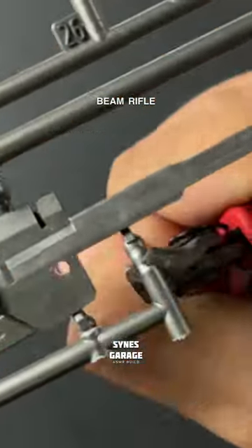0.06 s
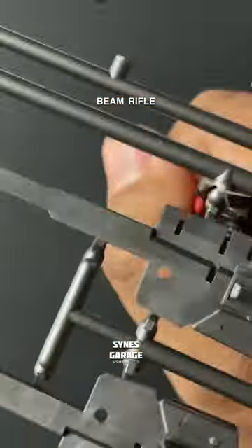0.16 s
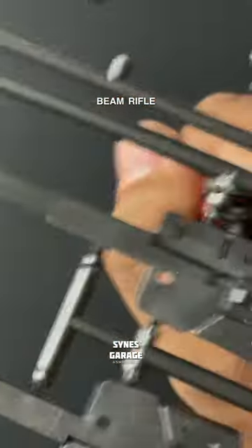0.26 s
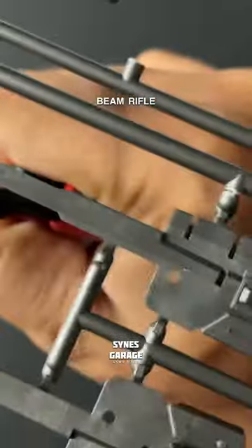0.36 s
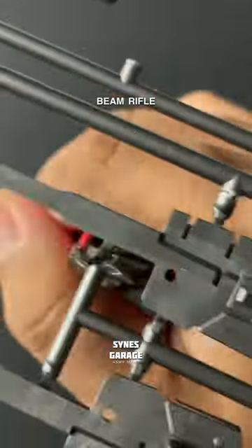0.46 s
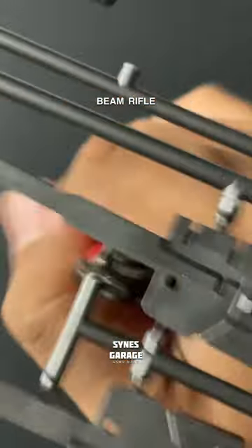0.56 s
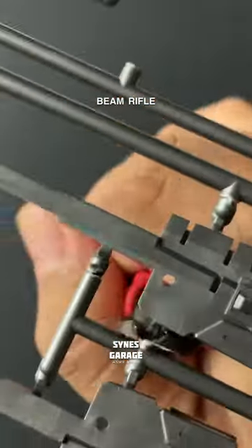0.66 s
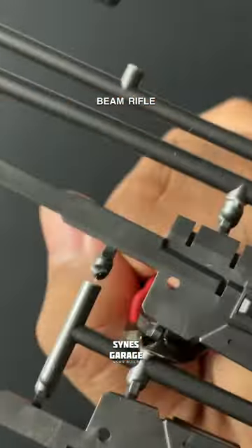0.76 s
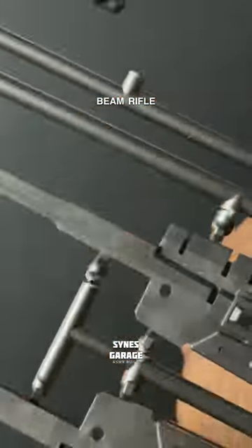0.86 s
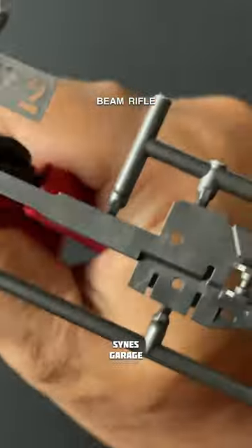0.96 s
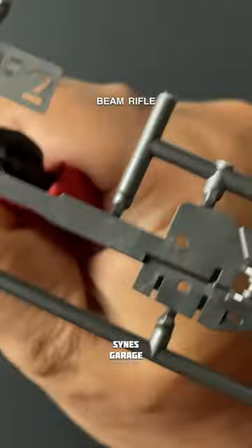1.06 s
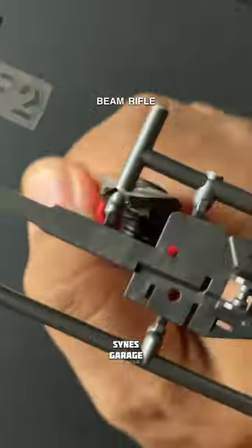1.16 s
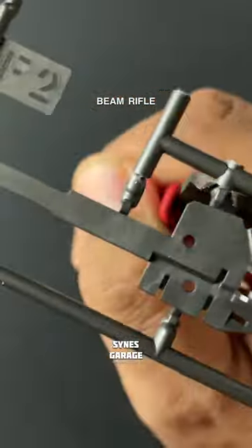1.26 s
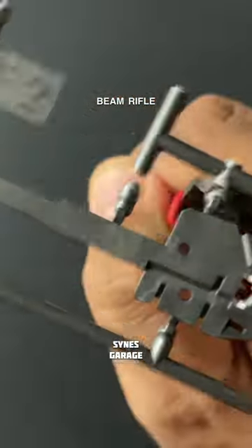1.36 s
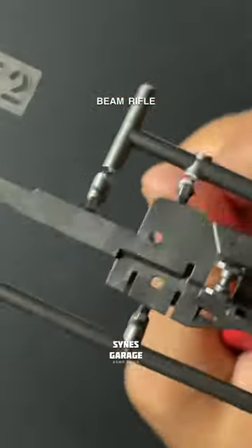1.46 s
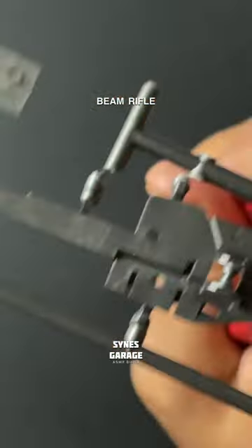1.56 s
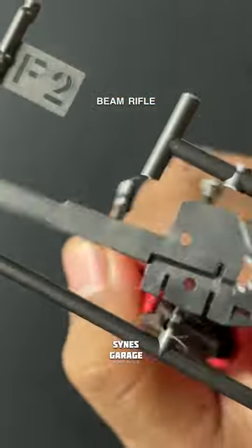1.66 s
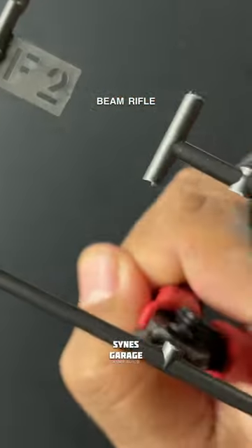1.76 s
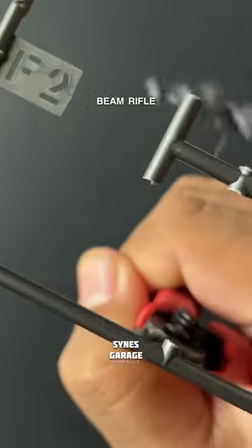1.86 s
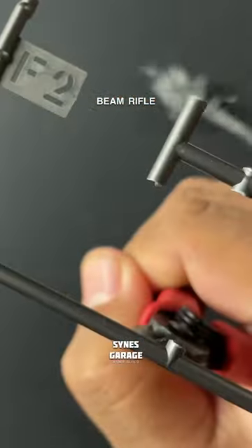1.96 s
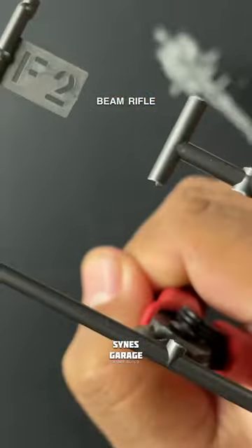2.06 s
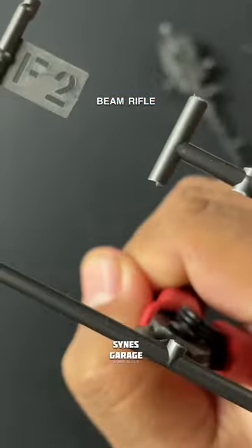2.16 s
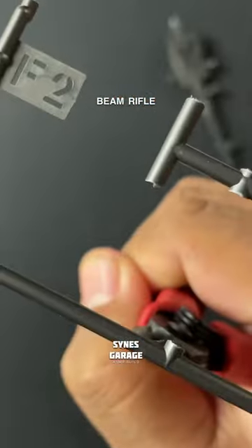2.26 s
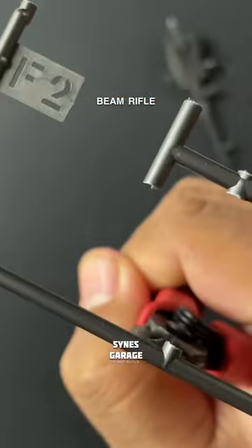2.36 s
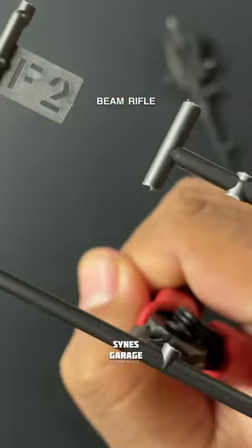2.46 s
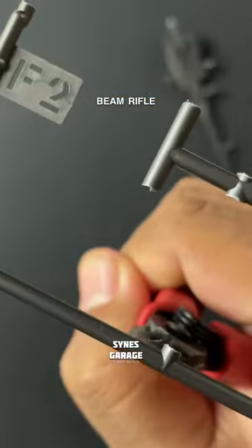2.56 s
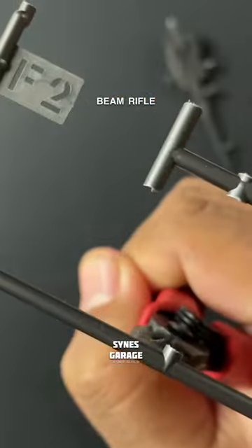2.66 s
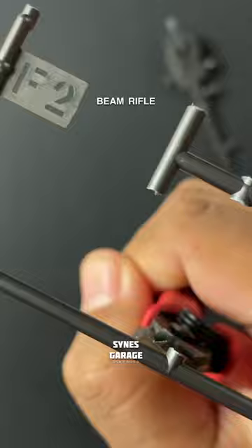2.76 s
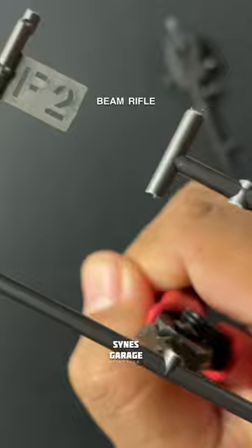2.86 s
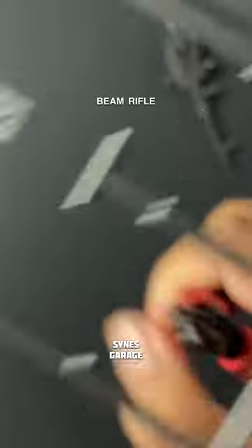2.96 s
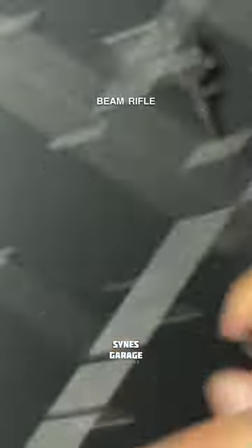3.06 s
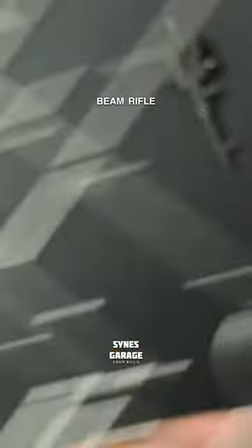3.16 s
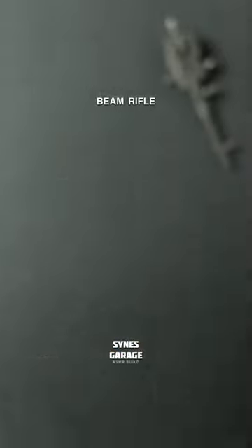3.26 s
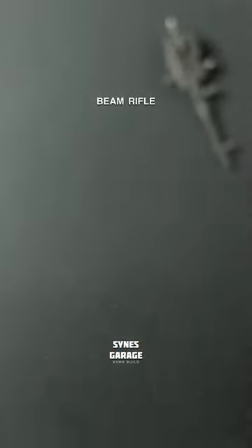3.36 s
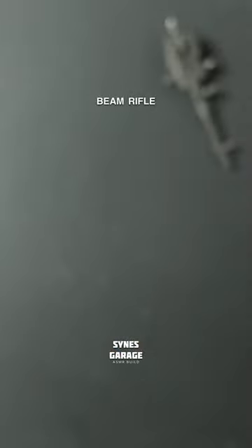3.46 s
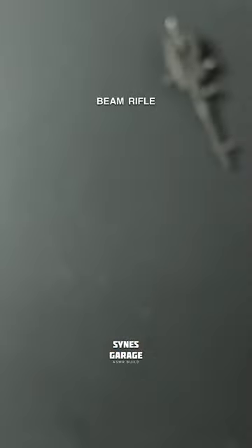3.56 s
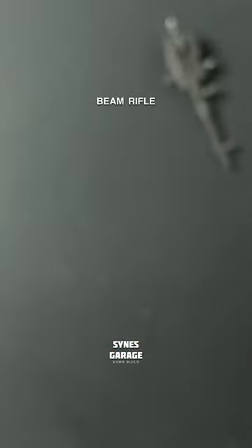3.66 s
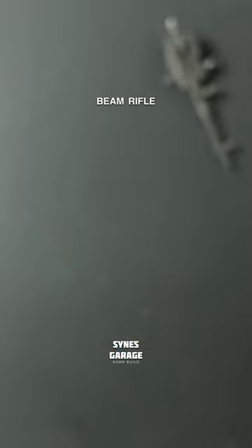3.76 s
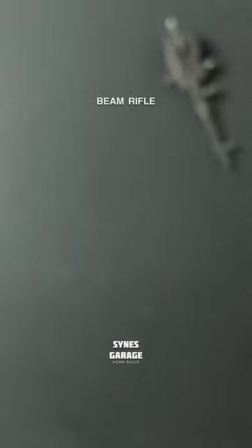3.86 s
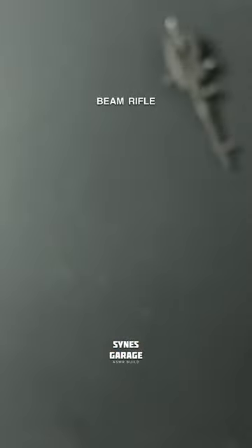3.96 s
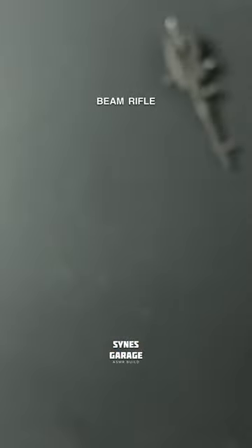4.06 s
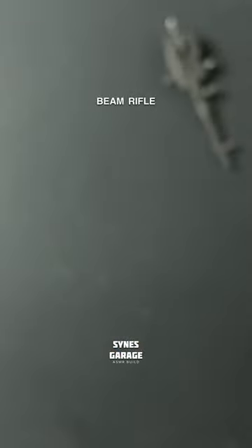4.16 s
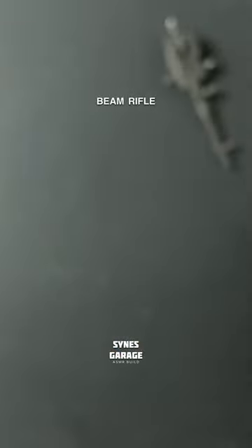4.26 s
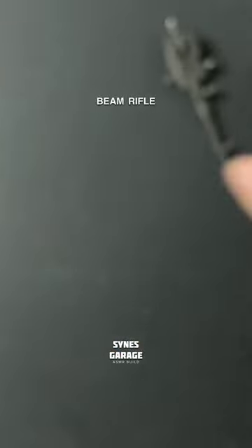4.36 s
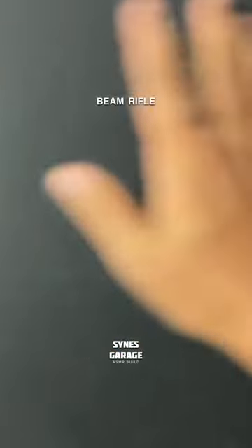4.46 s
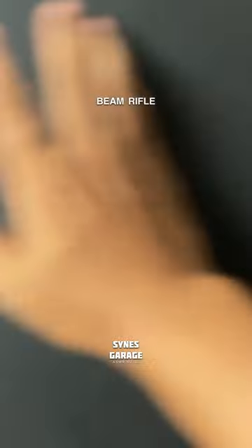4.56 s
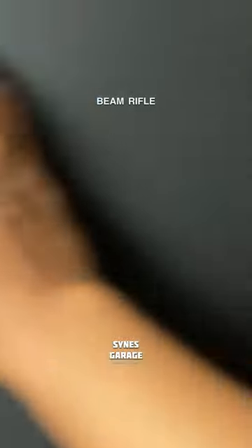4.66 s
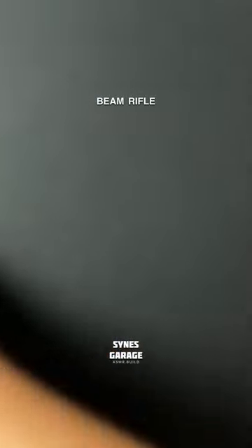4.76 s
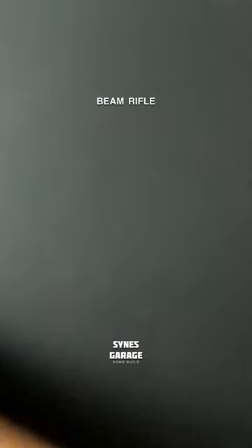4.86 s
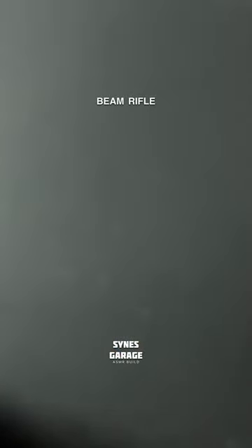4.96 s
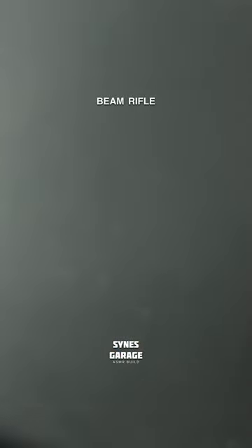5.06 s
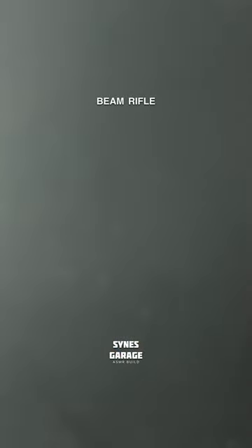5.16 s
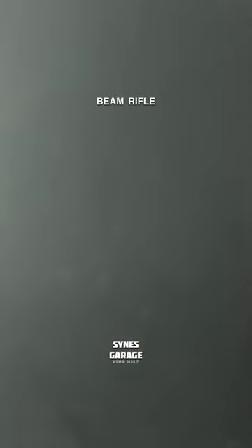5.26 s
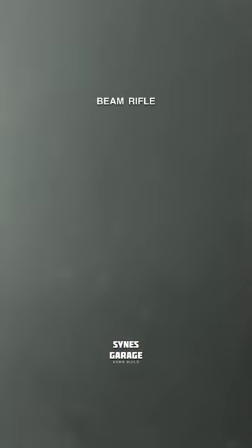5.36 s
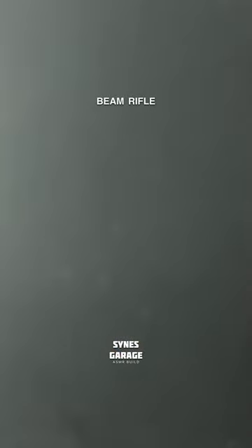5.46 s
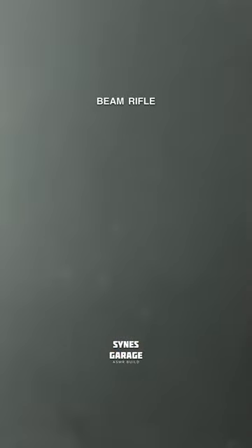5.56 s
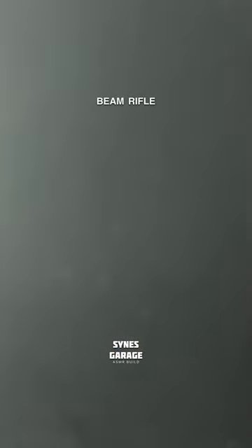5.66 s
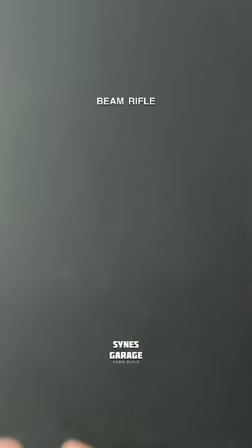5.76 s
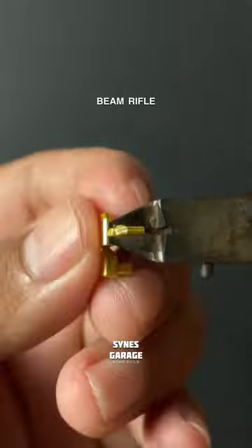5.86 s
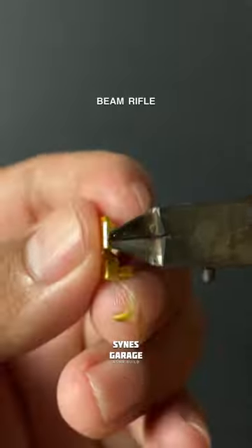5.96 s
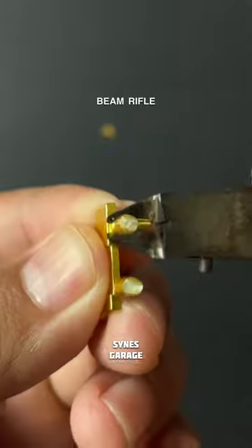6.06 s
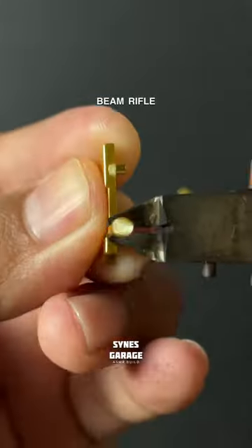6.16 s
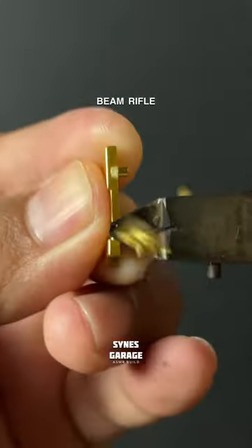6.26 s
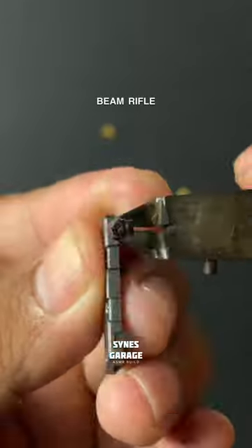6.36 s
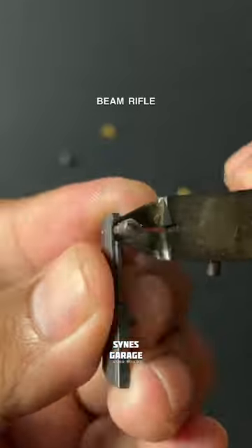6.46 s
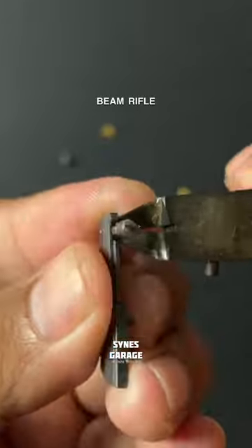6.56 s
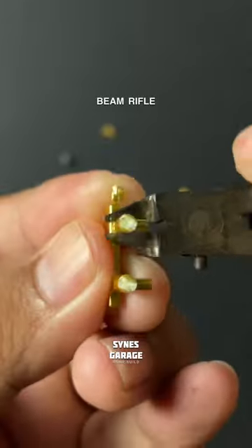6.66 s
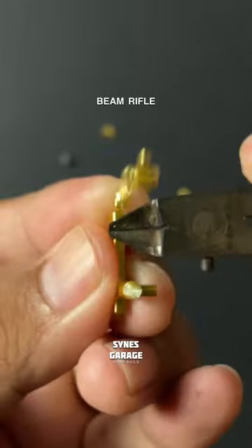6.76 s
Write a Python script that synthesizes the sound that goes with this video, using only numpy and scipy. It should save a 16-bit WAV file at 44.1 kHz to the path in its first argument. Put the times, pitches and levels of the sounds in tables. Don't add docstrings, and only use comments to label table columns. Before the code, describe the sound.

Very close stereo sound in a small quiet room with soft hiss and low building rumble. From 0.1 to 1.7 s nippers snap through a hard plastic frame eleven times, about every 0.16 s: loud, dry cracks with a short hollow ring, some overloading, tails chopped by abrupt cuts, with small clicks and faint spring whistles. The last snip rings out; at 1.97 s the freed part lands brightly, bounces at 2.15 and patters until 2.35. Faint sleeve rustle and tiny handling clicks follow to 3.3. At 3.5 the frame scuffs, thudding on the table at 3.84; the tool knocks down at 4.06. A palm lands near 4.4 and brushes the mat until 5.6, gritty and uneven, stubs ticking along. After a lull, thin stubs are trimmed from 5.92 to 6.73 in six quick moments, brighter, shorter, drier clicks, some doubled.

```python
import sys
import numpy as np
from scipy import signal
from scipy.fft import rfft, irfft, next_fast_len
from scipy.io import wavfile
from scipy.ndimage import uniform_filter1d, map_coordinates

SR = 44100
rng = np.random.default_rng(int(sys.argv[2]) if len(sys.argv) > 2 else 0)


def invert_db(level):
    return 10 ** (np.asarray(level, dtype=float) / 20)


def file_out(sig):
    cols = np.atleast_2d(sig).T
    lim = np.clip(cols, -1, 1)
    pcm = np.round(lim * 32767).astype(np.int16)
    wavfile.write(sys.argv[1], SR, pcm)


N = 299880

SCENE_CHANGES = [-1, .025, .181, .340, .499, .657, .823, .984, 1.140, 1.298, 1.458, 1.622, 5.864, 6.023,
                 6.176, 6.336, 6.502, 6.658]

# frequency in Hz, level in dB per Hz.
RUMBLE_SPECTRUM = [(12, -54), (20, -26.5), (50, -4.5), (69, -2), (108, -11.5), (127, -12.5), (140, -19.5),
                   (178, -29.5), (220, -19.5), (290, -45), (480, -120)]
# centre in seconds, half length in seconds, level in dB.
SWELLS = [(.3, 0.37, -58), (1.17, 0.23, -50.5), (1.72, 0.076, -43.5), (2.55, 0.56, -51.5),
          (3.6, 0.21, -49.5), (3.95, 0.098, -40.5), (4.15, 0.4, -59), (5.72, 0.2, -50.5), (6.7, 0.18, -74)]
# frequency in Hz, level in dB per Hz.
HISS_SPECTRUM = [(90, -29.5), (150, -12), (370, -18.5), (1100, -23.5), (2500, -29.5), (4500, -33),
                 (6800, -46.5), (9000, -49), (13000, -73)]
# frequency in Hz, t60 in seconds, colour in dB.
ROOM_DECAY = [(127, 0.45, 8.5), (406, 0.39, -6), (950, 0.36, -1), (1680, 0.35, -2.5), (2300, 0.27, 4.5),
              (3440, 0.2, -1.5), (5870, 0.18, 0.5), (8300, 0.17, -5.5), (10500, 0.17, -6),
              (13000, 0.29, -5.5), (15600, 0.083, -2.5)]

# frequency in Hz, left-right likeness from 0 to 1.
NEAR_LIKENESS = [(100, .97), (300, .93), (700, .72), (2000, .72), (4500, .9), (7000, .995)]
# frequency in Hz, left-right likeness from 0 to 1.
FAR_LIKENESS = [(60, .96), (300, .86), (700, .4), (1500, .3), (3000, .55), (5500, .9), (7400, .999)]
# frequency in Hz, lead of the left in radians.
PORT_PHASE = [(250, 0), (1290, -.6), (2930, .6), (3620, .1), (5170, .3), (6460, -.3), (7600, -3.05),
              (9000, -3.25), (10300, -5.8), (12800, -6.8), (14000, -9.2), (16200, -10)]
# frequency in Hz, share of the left-right gap from 0 to 1.
HAND_SHADOW = [(300, 0), (1200, 1), (4500, 1), (6600, 0)]

# frequency in Hz, level in dB per Hz.
MAT_SPECTRUM = [(60, -22), (110, -1), (200, -9.5), (500, -4), (1500, -4.5), (3500, -9.5), (4900, -14),
                (6100, -16.5), (6650, -12.5), (7100, -14.5), (8200, -9), (11000, -18.5), (13200, -23),
                (14000, -16), (15600, -42.5)]
# time in seconds, rub level in dB.
RUSTLE = [(2.2, -48.5), (2.36, -71.5), (2.44, -64), (2.55, -74.5), (2.62, -69.5), (2.76, -76.5), (2.9, -97)]
# time in seconds, rub level in dB.
FIDGET = [(2.9, -77.5), (3.12, -65.5), (3.3, -72), (3.46, -75)]
# time in seconds, rub level in dB.
SCUFF = [(3.46, -86), (3.498, -43.5), (3.536, -40), (3.616, -58.5), (3.694, -68), (3.82, -82)]
# time in seconds, rub level in dB.
LAND = [(4.1, -69.5), (4.34, -69), (4.36, -58), (4.44, -52.5), (4.49, -54)]
# time in seconds, rub level in dB.
SWEEP = [(4.493, -58), (4.503, -46.5), (4.6, -45), (4.72, -45.5), (4.9, -46), (5.042, -43.5), (5.19, -44.5),
         (5.21, -41), (5.28, -44), (5.4, -46.5), (5.49, -46.5), (5.59, -43.5), (5.62, -70)]
# time in seconds, rub level in dB.
LIFT = [(5.6, -57.5), (5.82, -61.5), (5.86, -58)]
# pressure curve, low band in dB, high band in dB at firm pressure.
GESTURES = [
    (RUSTLE, 6.4, -2.8),
    (FIDGET, 2.1, 2.7),
    (SCUFF, -5, -8.5),
    (LAND, -14, -1.5),
    (SWEEP, -1.65, -1.8),
    (LIFT, 2.6, -12.5),
]

# start in seconds, end in seconds, frequency in Hz, level in dB.
SPRING_WHISTLES = [(0.35, .41, 3820, -72.5), (0.543, 0.57, 4150, -75), (0.64, 0.724, 4030, -65.5),
                   (1.194, 1.233, 3940, -51), (1.299, 1.36, 3902, -57.5), (1.775, 1.859, 3874, -69),
                   (1.884, 1.958, 3890, -62.5), (5.881, 5.927, 5220, -63), (6.516, 6.57, 4480, -69.5)]
# start in seconds, frequency in Hz, level in dB, t60 in seconds.
SINGLE_RINGS = [(.0945, 2440, -25.5, 0.18), (.263, 9450, -17.5, 0.044), (.265, 2460, -25.5, 0.16),
                (.265, 2245, -23, 0.21), (.899, 2444, -23.5, 0.12), (.899, 2230, -25, .2),
                (1.056, 2300, -37, 0.25), (.412, 1300, -20.5, .03), (.578, 1380, -26.5, 0.026),
                (.723, 1420, -7, 0.021), (0.897, 1414, -12, 0.037), (1.223, 1440, -11.5, 0.019),
                (1.36, 2410, -28.5, 0.21), (1.532, 9400, -16.5, .03), (1.532, 1440, -10.5, 0.02),
                (1.695, 9400, -15, 0.044), (1.695, 1370, -4.5, 0.016), (1.712, 8770, 1.5, 0.025),
                (3.843, 404, -18.5, 0.064), (3.843, 1145, -34, 0.22), (3.843, 1900, -37.5, 0.18),
                (4.057, 372, -22.5, 0.37), (4.057, 968, -34, 0.47), (4.057, 1268, -30, 0.37),
                (4.057, 1690, -43, .3), (5.925, 10500, -18, .012), (5.926, 300, -33, 0.064),
                (6.727, 5540, -23.5, .03)]
# frequency in Hz, level in dB, t60 in seconds.
PART_RING_MODES = [(1178, -9, .12), (1860, -10, 0.099), (2880, -12, 0.092), (3150, -21.5, 0.102),
                   (3746, 1, 0.067), (3960, -10, 0.13), (5970, -11, .12), (6635, -6, .09),
                   (6714, -2.5, 0.056), (8300, 10.5, .05), (8340, 16, 0.095), (9000, 7.5, 0.095),
                   (10940, 5.5, 0.054), (12440, 1, 0.08)]
# start in seconds, level in dB.
PART_RINGS = [
    (1.9715, -25.5),
    (2.147, -35.5),
    (2.2564, -58),
    (2.2962, -49),
]

# mode frequency in Hz, width in Hz, level in dB.
FRAME_BODY = [(372, 190, 7), (930, 1100, 2), (1380, 670, 5), (2050, 330, -1), (2390, 270, 2),
              (3230, 1400, -9.5), (3720, 510, -6), (5700, 200, -15.5), (7055, 3300, -13), (9120, 3800, 1),
              (12470, 3700, -1.5), (15200, 1800, -16.5)]
# mode frequency in Hz, width in Hz, level in dB.
STUB_BODY = [(248, 65, -9.5), (890, 150, -19.5), (1996, 190, -7), (2340, 200, -5), (3867, 6100, -13.5),
             (5610, 240, 4), (7700, 1700, -1.5), (10760, 1000, 12), (11400, 1600, -3), (16500, 1600, 13)]
# mode frequency in Hz, width in Hz, level in dB.
PART_BODY = [(121, 36, 12.5), (490, 92, 14), (1270, 380, 3), (1900, 2000, -1.5), (3570, 160, 4),
             (6700, 3900, -14.5), (8100, 230, -5.5), (10000, 4900, 2.5), (12900, 1200, -22.5),
             (15800, 1800, -13)]
# mode frequency in Hz, width in Hz, level in dB.
TABLE_BODY = [(120.2, 26, -4.5), (240, 79, -5), (393.3, 140, 3), (715, 220, 6), (1190, 375, 2),
              (1990, 630, -7), (4020, 2600, -8.5), (5950, 2000, -14)]
LOOSE_END_HZ = (2150, 2800)

# start in seconds, peak in dB, low band in dB,
# high band in dB.
TICKS = [(-.06, -4, -30, -31), (.056, -36, -53, -23), (.522, -48.5, -26, 11.5), (1.202, -49.5, -26, 5.5),
         (1.35, -26.5, -23.5, 0.5), (1.673, -33, -28.5, -1), (1.706, -29, -8, 2.5),
         (1.712, -24.5, -20, 6.5), (1.793, -37.5, -26.5, -6), (2.921, -55, -16.5, 12.5),
         (2.99, -65, -16, 14), (3.052, -58, -16, -3), (3.195, -66, -20, 5)]
# start in seconds, peak in dB, low band in dB, high band in dB.
TOUCHES = [(.088, -18.5, -20, -2), (1.960, -24.5, -3, -14.5), (3.060, -51, -21, 6),
           (3.105, -57, -22.5, -14), (6.098, -47.5, -12.5, 8.5), (6.714, -47.5, 0.5, -7)]
# start in seconds, peak in dB, low band in
# dB, high band in dB.
LIGHT_CLICKS = [(4.5052, -39, -10, -13), (4.525, -39, -13, -1), (4.548, -35.5, -3.5, -18), (4.9687, -45, -13, 21),
                (4.9911, -40, -13, 28.5), (5.0101, -38, -28, 21.5), (5.0844, -38, -20, -4), (5.1562, -37, -16, 10),
                (5.1982, -22.5, -31, -19.5), (5.2824, -49, -18, -1.5), (5.315, -22, -14.5, 10),
                (5.4895, -50, -19, -2), (5.5424, -43, -19, 16), (5.5571, -47, -22, 6.5), (3.4823, -41, -10, 0),
                (3.4923, -42, -9, -7.5), (3.5277, -42.5, 1, -1), (3.8425, -26.5, -12.5, -31),
                (4.057, -37, -23, -31)]
# start in seconds, peak in dB, low band in dB, high band in dB.
DROPS = [
    (1.9686, -22, -34, 4),
    (1.9707, -10, -23.5, 12),
    (2.1408, -10, -21.5, -26),
    (2.146, -17, -8, 0),
    (2.2549, -29.5, -19, -1),
    (2.2959, -33.5, -9, 8.5),
    (2.3181, -39, -12, -7.5),
    (2.3455, -44, -8, 0),
]
# start in seconds, peak in dB, low band in dB, high band in dB.
THUDS = [
    (3.8425, -2.5, -11.5, -17),
    (3.856, -16, -0.5, -11.5),
    (3.895, -24.5, 1, -27),
    (3.93, -28.5, 0.5, -29),
    (4.047, -28, 12.5, -30),
    (4.057, -8.5, -6.5, -8),
    (4.075, -21, 2, -23),
    (4.087, -16.5, -12, -12),
    (4.108, -20.5, 5, -24),
]
# start in seconds, peak in dB, low band in dB, high band in dB, free-end ring in dB.
TRIMS = [(5.9248, -7, -31.5, 12, 3), (6.1079, -5, -26.5, 1.5, 5), (6.111, -16, -19, 3, -3),
         (6.2437, -7, -27.5, 9, 5.5), (6.2474, -7.5, -24, -1, -6), (6.4253, -13, -36, 1, 2.5),
         (6.5814, -7, -31, 7, 0.5), (6.7276, -7, -31, 0, -2)]
# start in seconds, peak in dB, low in dB, high in dB, runner ring in dB.
BITES = [(.25, -32.5, -0.5, -39.5, 9.5), (.281, -23, -26, -41, 2.5), (.402, -52, -9.5, -36, -1),
         (.911, -18.5, -22, -35, 4.5), (.887, -40, -5.5, -44, 6.5), (1.044, -55, 2, -43, 14)]
# start in seconds, peak in dB, low band in dB, high band in dB, runner ring in dB.
SNIPS = [(0.0943, 0.5, -9.5, -5.5, 3), (0.2623, 1, -7.5, -5, 1), (0.41, -5.5, -2.5, -15, 4.5),
         (0.5761, -7, -2.5, -12, 1.5), (0.7217, -0.5, -8, -21.5, -3.5), (0.8981, 3.5, -7, -24, 2.5),
         (1.055, -5, -12, -29.5, -3), (1.222, -3, -10, -6.5, 1.5), (1.3574, 4.5, -16, -7, -2),
         (1.5313, -9, -8, -23, -3), (1.694, -4.5, -5.5, -4, -3)]

FIRM_DB, BRIGHTENS = -48.5, 0.41
RUMBLE_DB = -55.5
SNIP_HISS_DB, LONG_HISS_DB, TRIM_HISS_DB = -57, -62.5, -61.5
SOFT_HZ = 6600
TINY, SHORT, LONG = 3584, 6656, 13312


def unit(x):
    return x / np.sqrt(np.mean(x ** 2) + 1e-20)


def along(points, hz):
    f, v = np.transpose(points)
    return np.interp(np.log(hz + 1), np.log(f + 1), v)


def wobble(rate):
    knots = rng.standard_normal(int(N * rate / SR) + 4)
    return map_coordinates(knots, [np.arange(N) * rate / SR])


def filtered(x, response):
    m = next_fast_len(x.shape[-1] + 4096)
    return irfft(rfft(x, m) * response(np.fft.rfftfreq(m, 1 / SR)), m)[..., :x.shape[-1]]


def spread(pair, likeness):
    def mid_side(hz):
        turn = np.arccos(np.clip(along(likeness, hz), -1, 1)) / 2
        return np.array([np.cos(turn), np.sin(turn)])

    mid, side = filtered(pair, mid_side)
    return np.array([mid + side, mid - side])


def rush(spectrum, patchy_db, drift_db=0):
    z = signal.stft(rng.standard_normal((2, N)), nperseg=512)[2]
    patches = uniform_filter1d(rng.standard_normal(z.shape[1:]), size=6, axis=0)
    patches = uniform_filter1d(patches, size=8, axis=1)
    drift = uniform_filter1d(uniform_filter1d(patches, size=18, axis=0), size=14, axis=1)
    gain = invert_db(patchy_db * unit(patches) + drift_db * unit(drift))
    pair = signal.istft(z * gain, nperseg=512)[1][:, :N]
    coloured = filtered(pair, lambda hz: invert_db(along(spectrum, hz)))
    return unit(spread(coloured, FAR_LIKENESS))


def time_left(s):
    return min([cut - s for cut in SCENE_CHANGES if cut > s] + [1])


def air():
    t = np.arange(N) / SR
    take = np.searchsorted(SCENE_CHANGES, t) - 1
    swell = invert_db(RUMBLE_DB) + sum(invert_db(db) * np.exp(-((t - s) / half) ** 2) for s, half, db in SWELLS)
    rumble = swell * invert_db(2.5 * wobble(8)) * rush(RUMBLE_SPECTRUM, 0.8)
    snipping, before_trims = t < SCENE_CHANGES[11], t < SCENE_CHANGES[12]
    hiss_db = np.select([snipping, before_trims], [SNIP_HISS_DB, LONG_HISS_DB], TRIM_HISS_DB)
    hiss = invert_db(hiss_db + [[0.6], [-0.6]] + 0.89 * wobble(21)) * rush(HISS_SPECTRUM, 3.5, drift_db=-0.5)
    fade_in = np.clip((t - np.array(SCENE_CHANGES)[take]) / 0.1, 0.08, 1)
    return (rumble + hiss) * fade_in


def hand():
    t = np.arange(N) / SR
    edges = np.array([0, 1000, 7200, SR])[:, None, None]
    rub = rush(MAT_SPECTRUM, 1.2, drift_db=1.0)
    bands = filtered(rub, lambda hz: (hz >= edges[:-1]) * (hz < edges[1:]))
    bands = np.array([unit(band) for band in bands])
    gains = 0
    for pressure, low_db, high_db in GESTURES:
        seconds, level_db = np.transpose(pressure)
        rub_db = np.interp(t, seconds, level_db)
        touching = (t > seconds[0]) * (t < seconds[-1])
        treble_db = rub_db + high_db + BRIGHTENS * (rub_db - FIRM_DB)
        gains = gains + touching * invert_db([rub_db + low_db, rub_db, treble_db])
    catches = (rng.random(N) < 130 / SR) * rng.exponential(70.0, N)
    grit = 1 + 0.19 * uniform_filter1d(catches, size=50)
    unsteady = invert_db([[0.5], [-0.5]] + 0.69 * wobble(25) + 1.12 * wobble(300))
    present = t < SCENE_CHANGES[12]
    return present * grit * unsteady * np.sum(gains[:, None] * bands, axis=0)


def spring():
    out, t, rub = np.zeros(N), np.arange(N) / SR, wobble(550)
    for start, end, hz, db in SPRING_WHISTLES:
        swell = np.clip(np.minimum((t - start) / 0.025, (end - t) / 0.0098), 0, 1)
        out += invert_db(db) * swell * np.sin(2 * np.pi * hz * t) * rub
    return out


def ringing():
    out, t = np.zeros(N + LONG), np.arange(LONG) / SR
    shiver = 1 + 0.6 * wobble(160)
    rings = list(SINGLE_RINGS)
    for s, db in PART_RINGS:
        for hz, mode_db, t60 in PART_RING_MODES:
            rings.append((s, hz, db + mode_db + rng.normal(0, 2.2), t60))
    for s, hz, db, t60 in rings:
        envelope = invert_db(db - 60 * t / t60) * (1 - np.exp(-t / 0.0006)) * (t < time_left(s))
        start = round(s * SR)
        out[start:start + LONG] += envelope * np.sin(2 * np.pi * (hz * t + rng.random()))
    return out[:N] * shiver * invert_db([[0.8], [-0.8]])


def body_modes(modes, free_db):
    luck = rng.standard_normal((len(modes), 2)) * [1.5, 0.01]

    def response(f):
        total = 0
        for k, ((hz, width, db), (luck_db, detune)) in enumerate(zip(modes, luck)):
            loose_db = free_db * (LOOSE_END_HZ[0] < hz < LOOSE_END_HZ[1])
            centre = hz * (1 + detune)
            mode = 1j * f * width / (centre ** 2 - f * f + 1j * f * width)
            total = total + (-1) ** k * invert_db(db + luck_db + loose_db) * mode
        return total

    return response


def room_answer(t, lead):
    size = len(t)
    room_hz, *columns = np.transpose(ROOM_DECAY)
    bins = np.fft.rfftfreq(256, 1 / SR)
    t60, colour_db = (along(np.transpose([room_hz, c]), bins)[:, None] for c in columns)
    _, frames, z = signal.stft(rng.standard_normal((2, size - lead)), SR, nperseg=256)
    tail = signal.istft(z * invert_db(colour_db - 60 * frames / t60), SR, nperseg=256)[1][:, :size - lead]
    tail = np.pad(tail, ((0, 0), (lead, 0)))
    echoes = unit(uniform_filter1d(rng.standard_normal(size), size=90))
    lumps = invert_db(3.5 * echoes * np.exp(-np.clip(t, 0, None) / 0.04))
    return spread(tail * lumps * np.clip(t / 0.0015, 0, 1), FAR_LIKENESS)


def strikes(events, modes, crack_t60, low_hz, high_hz, bite_db, room_db, pan_db, size=LONG, order=3):
    out = np.zeros((2, N + 2 * size))
    lead = round(0.02 * SR)
    t = np.arange(size) / SR - 0.02
    after = np.clip(t, 0, None)
    edges = [(low_hz, "low"), ([low_hz, high_hz], "band"), (high_hz, "high")]
    bands = [signal.butter(order, edge, kind, fs=SR, output="sos") for edge, kind in edges]
    attack = 1 - np.exp(-after / np.array([[0.0018], [0.0007], [0.0005]]))
    cracks = invert_db(-60 * after / np.array(crack_t60)[:, None]) * attack
    bites = invert_db(bite_db + np.array([[0], [0], [-25]]) + 2200 * t) * (t < 0)
    sides = pan_db * np.array([[0.5], [-0.5]])
    for s, db, low_db, high_db, *free_db in events:
        ring = body_modes(modes, sum(free_db))
        room = invert_db(room_db)[:, None, None] * room_answer(t, lead)
        shock = rng.standard_normal((2, size))
        shock[0, lead + 14] = 7.0
        source = spread(shock, NEAR_LIKENESS) * (cracks + bites)[:, None] + room
        rung = filtered(source, lambda f: ring(f) * invert_db(sides * along(HAND_SHADOW, f)))
        blow = 0
        for band, part, level_db in zip(bands, rung, (low_db, 0, high_db)):
            part = signal.sosfilt(band, part)
            peak = abs(part.mean(0)[:lead + 400]).max()
            blow = blow + invert_db(level_db) * part / peak
        start = size + round((s - 0.0005) * SR) - lead
        out[:, start:start + size] += invert_db(db) * blow * np.clip((time_left(s) - t) / 0.0011, 0, 1)
    return out[:, size:size + N]


def handling():
    touches = strikes(TOUCHES, PART_BODY, (0.01, 0.007, 0.005), low_hz=730.0, high_hz=7100, bite_db=-59.0,
                      room_db=(-10, -15, -18), pan_db=4, size=TINY)
    ticks = strikes(TICKS, PART_BODY, (0.01, 0.007, 0.006), low_hz=716, high_hz=7100, bite_db=-62.5,
                    room_db=(-24, -24, -26), pan_db=3.0, size=SHORT)
    return touches + ticks


def loose_plastic():
    drops = strikes(DROPS, PART_BODY, (0.03, 0.007, 0.005), low_hz=706, high_hz=7000, bite_db=-52.0,
                    room_db=(-22, -22, -25), pan_db=3.0)
    rolls = strikes(LIGHT_CLICKS, PART_BODY, (0.02, 0.006, 0.004), low_hz=673, high_hz=7410, bite_db=-57.0,
                    room_db=(-15, -14, -23), pan_db=7.0, size=TINY)
    return drops + rolls


def thuds():
    knocks = strikes(THUDS, TABLE_BODY, (0.07, 0.04, 0.012), low_hz=388, high_hz=2920, bite_db=-21,
                     room_db=(-5.5, -6.5, -10), pan_db=3.0, order=2)
    return signal.sosfilt(signal.butter(3, SOFT_HZ, fs=SR, output="sos"), knocks)


def trims():
    return strikes(TRIMS, STUB_BODY, (0.025, 0.008, 0.005), low_hz=680, high_hz=7960, bite_db=-50.5,
                   room_db=(-27.5, -27.5, -31), pan_db=3.0, size=SHORT)


def snips():
    out = strikes(BITES, FRAME_BODY, (0.03, 0.03, 0.008), low_hz=1500, high_hz=3300, bite_db=-48.5,
                  room_db=(-11, -11, -11), pan_db=-3.0, size=SHORT)
    for rows, size in ((SNIPS[:-1], SHORT), (SNIPS[-1:], LONG)):
        out = out + strikes(rows, FRAME_BODY, (0.021, 0.0115, 0.007), low_hz=1440, high_hz=7620, bite_db=-40.0,
                            room_db=(-24, -25, -28), pan_db=4.0, size=size)
    return out


def scene():
    background = air() + hand() + spring() + ringing()
    return background + handling() + loose_plastic() + thuds() + trims() + snips()


def band_limit(x):
    return signal.sosfilt(signal.butter(12, 16870, fs=SR, output="sos"), x)


def record(dry):
    half = along(PORT_PHASE, np.fft.rfftfreq(next_fast_len(N + 4096), 1 / SR)) / 2
    phase = np.exp(1j * half * np.array([[1], [-1]]))
    ports = filtered(dry, lambda hz: phase * np.clip((17200 - hz) / 1200, 0, 1) ** 2)
    return band_limit(np.clip(ports, -1, 1))


dry = scene()
out = record(dry)
file_out(out)
```